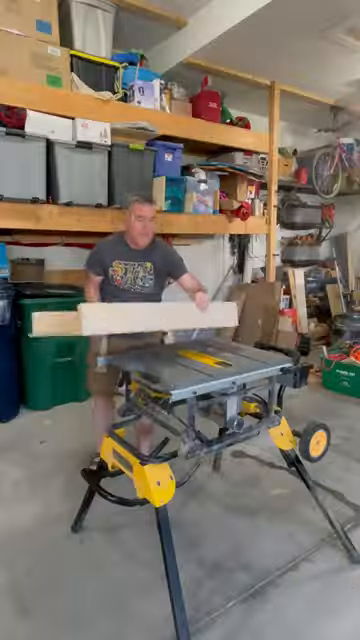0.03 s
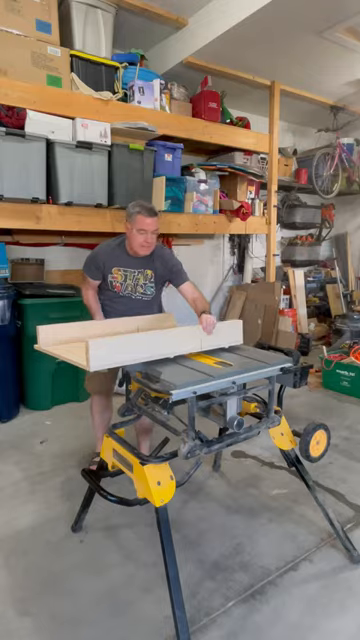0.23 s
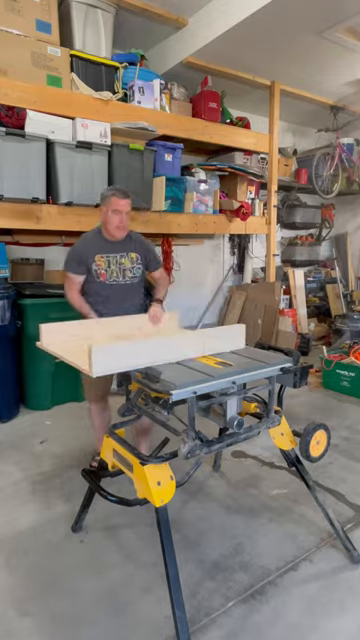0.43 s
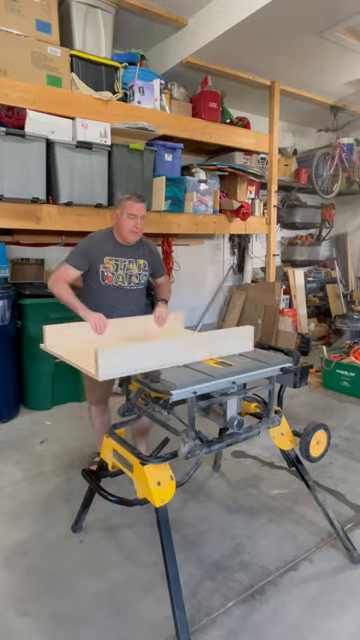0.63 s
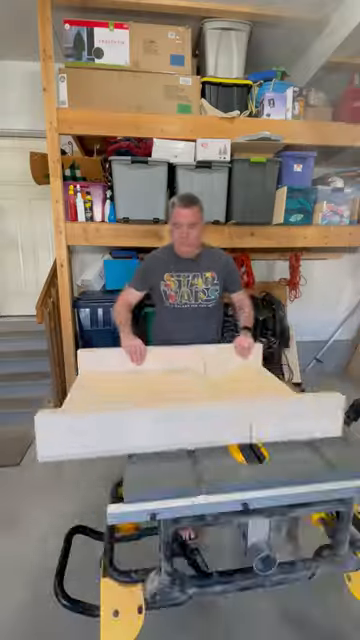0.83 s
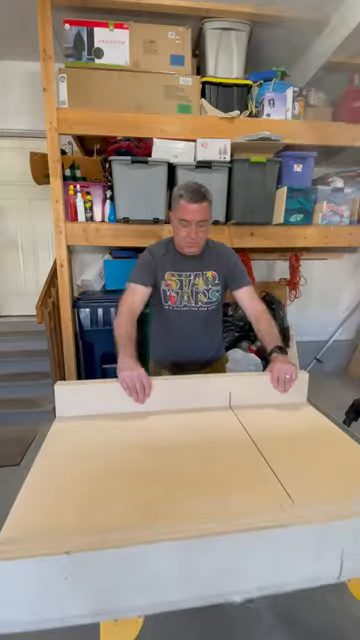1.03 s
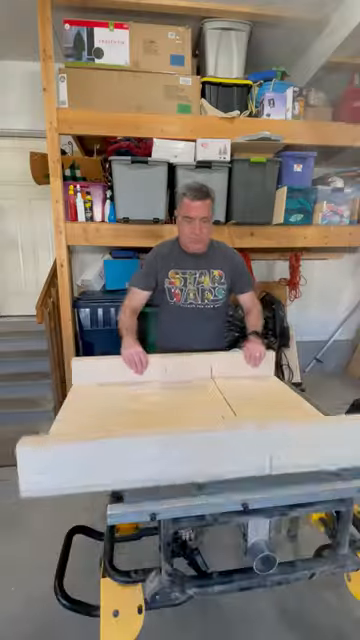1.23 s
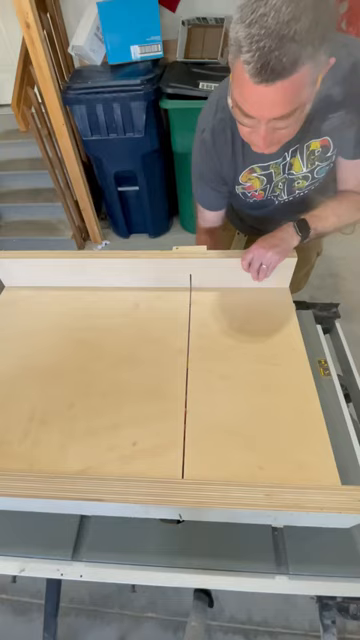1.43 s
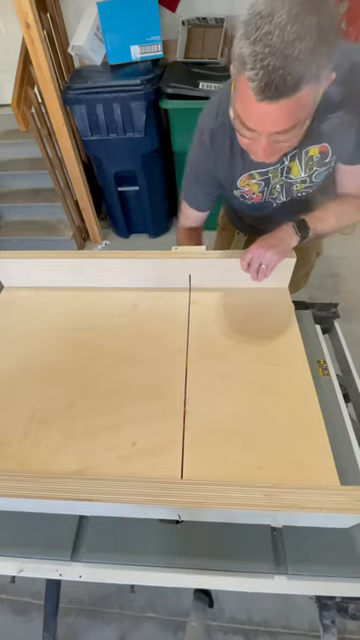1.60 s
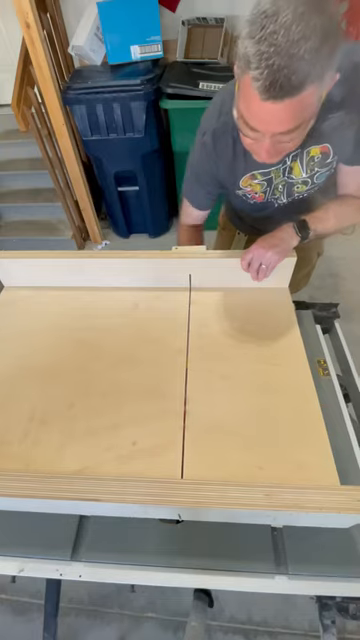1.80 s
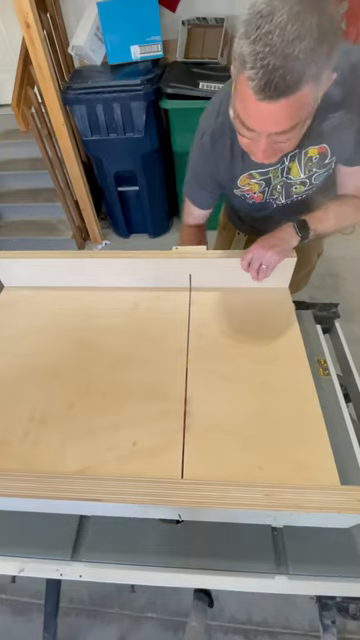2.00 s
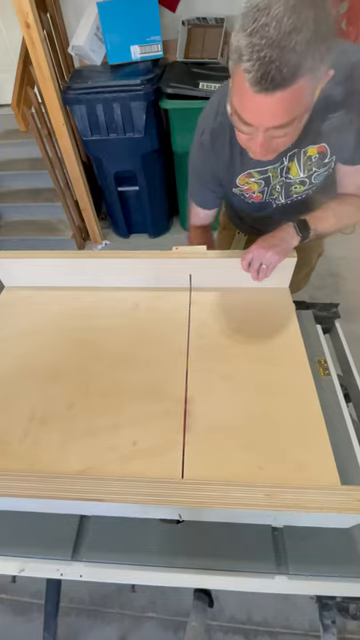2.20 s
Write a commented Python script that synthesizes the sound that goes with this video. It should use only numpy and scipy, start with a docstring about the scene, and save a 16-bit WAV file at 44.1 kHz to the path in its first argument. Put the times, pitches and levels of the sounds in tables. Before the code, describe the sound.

A plywood sled knocks onto a table saw at about 0.2 seconds and claps flat with a loud, short rattle around 0.3. From 0.6 to 1.4 seconds it slides in a few quieter, rasping pushes with faint hollow bumps. From 1.5 to about 2.4 seconds a crank is wound fast, roughly nine turns, its gears clicking, knocking and grinding in rhythm. The garage adds a short reverberation.

```python
"""Plywood sled on a table saw

In a garage, a sled lands on one edge, then claps flat and rattles: impacts excite the board's modes.
It is pushed over the table a few times, and sliding friction makes it hiss, rasp and ring.
Then a crank on the saw is wound fast: a train of gear-tooth impacts drives the housing into
resonance, and the gears knock, bind and grind once every turn."""
import sys
import numpy as np
from scipy import signal
from scipy.fft import rfft, irfft, next_fast_len
from scipy.io import wavfile
from scipy.ndimage import uniform_filter1d

SR = 44100
rng = np.random.default_rng(int(sys.argv[2]) if len(sys.argv) > 2 else 0)


def pcm_store(signal):
    """Save signal as 16-bit PCM."""
    levels = np.round(np.clip(np.atleast_2d(signal), -1, 1) * 32767)
    wavfile.write(sys.argv[1], SR, levels.astype(np.int16).T)


N = 103635
T = np.arange(N) / SR

# Levels in the tables are relative.
# skids of the sled's edge (start [s], length [s], hiss [dB], rasp [dB], fall [dB/s])
SKIDS = [(0, 0.092, -59.5, -84, 197), (0.179, 0.33, -39.5, -40, 69.5), (0.786, 0.028, -56, -46.5, 202),
         (0.983, 0.063, -59, -48.5, 206), (1.314, .015, -79, -64, 300)]
# impacts on the table (time [s], thud [dB], crack [dB], contact cut-off [Hz], flatness [0-1])
BLOWS = [(0.1818, -21, -52, 760, 0.18), (.192, -26, -46, 800, 0.7), (.2200, -19, -33.5, 3740, 0),
         (0.2324, -24, -47, 1170, 0), (.249, -27, -51.5, 1000, .1), (0.2839, -9.5, -36, 695, .2),
         (0.2908, -14, -18.5, 2860, 0.98), (.3190, -18.5, -31.5, 2520, 0.98),
         (.3270, -13, -27.5, 4620, 0.94), (0.3393, -24, -27, 2970, 0.86), (.477, -40.5, -70, 1200, 0.5),
         (.813, -29.5, -51, 1300, 0.06)]
# modes of the sled (frequency [Hz]) and, row for row, (level on edge [dB], level flat [dB], t60 [s])
SLED_HZ = [165, 328, 440, 531, 615, 660, 733, 845, 1056, 1158, 1324, 1940, 2522, 3081]
SLED_MODES = [(-34, -21.5, 0.19), (-2, -8, 0.15), (-5.5, -7.5, .16), (-4, -7, 0.16), (1, -6, 0.12),
              (-3.5, 1.5, .13), (5, -3, 0.17), (2, -9, 0.15), (-26, 6.5, 0.09), (-9, -1.5, 0.17),
              (-22, 7.5, 0.13), (-1.5, -9.5, 0.092), (-20, -16.5, .15), (-13.5, -22, 0.06)]
# spectra of the board's dense resonances and of the faces meeting (frequency [Hz], level [dB])
BOARD = [(30, -25), (100, -24), (170, -16.5), (320, -7.5), (700, 0.5), (1000, -1.5), (1350, 0), (1800, -3),
         (3200, -4.5), (6000, -16.5), (16000, -6)]
CRACK = [(100, -30.5), (600, -2), (1300, 0.5), (2500, 0), (5000, 2.5), (9000, -2), (13000, -6), (16000, -4)]
# friction during the pushes (time [s], hiss [dB], rasp [dB])
PUSHES = [(0.585, -100, -87), (0.599, -79, -66.5), (0.631, -60, -47.5), (0.671, -46.5, -43),
          (0.715, -45, -49), (0.721, -60, -55), (0.731, -68, -51), (0.773, -47, -40.5),
          (0.815, -48.5, -41.5), (0.857, -43.5, -39), (0.925, -47, -49), (0.999, -45, -44),
          (1.057, -55, -43.5), (1.117, -65.5, -54.5), (1.157, -55.5, -43), (1.199, -47, -39.5),
          (1.269, -51, -49.5), (1.325, -66, -54.5), (1.367, -71.5, -64), (1.383, -83.5, -81.5),
          (1.4, -77, -93.5)]
# friction spectra (frequency [Hz], level [dB])
HISS = [(300, -26.5), (1500, -6.5), (3000, -4), (4500, -1.5), (7000, -3), (10000, -6.5), (13000, -13),
        (16000, -16.5)]
RASP = [(60, -45), (150, -6), (320, 0), (560, -8), (760, 0), (1000, 0.5), (1450, 1.5), (2000, -1),
        (2600, -0.5), (4500, -5.5), (9000, -21.5)]
# modes driven by sliding (frequency [Hz], level [dB], t60 [s])
SLIDE_MODES = [(736.3, 1, 0.17), (1283, -4.5, .16), (1510, -2.5, 0.1), (1557, 0, .15), (2050, -4.5, 0.11),
               (2532, 0, .12), (4246, 0.5, 0.056)]
# hollow bumps of the rocking sled (time [s], level [dB])
BUMPS = [(0.734, -43), (.908, -46), (1.252, -44.5)]
# turns of the crank (time of peak load [s], load [dB], time slack is taken up [s], knock [dB])
TURNS = [(1.471, -2, 1.4505, -33), (1.581, -1.5, 1.561, -46), (1.688, -2.5, 1.669, -42),
         (1.796, -0.9, 1.774, -41), (1.907, -1.3, 1.876, -37), (2.01, -0.7, 1.983, -39),
         (2.112, 0, 2.098, -34.5), (2.217, -2.5, 2.195, -34.5), (2.325, -1, 2.3, -38)]
# meshing rate of the gear teeth (time [s], rate [Hz])
TOOTH_RATE = [(1.45, 157.8), (1.57, 170.6), (1.78, 159.6), (1.90, 162.9), (2.03, 146.4), (2.11, 151.2),
              (2.21, 143.5), (2.33, 168.7)]
# spectra of tooth click, grinding, housing rumble and shaft hiss (frequency [Hz], level [dB])
TOOTH = [(100, -51.5), (300, -6.5), (600, -16), (850, -2), (1050, -5.5), (1450, 0.5), (1800, -1.5),
         (2500, -9), (3400, -21.5), (4200, -17), (5200, -34), (15000, -41)]
GRIND = [(500, -27), (1500, 3), (2600, -1.5), (3600, -1.5), (4300, -6.5), (5000, -4), (5800, -5.5),
         (7500, -14.5), (10000, -22.5), (15000, -23)]
RUMBLE = [(30, -24), (70, -26), (110, -10), (150, 3), (220, -8.5), (300, 6.5), (380, -7), (600, -17),
          (1500, -66)]
SHAFT = [(500, -25), (2500, 3), (4000, 1.5), (5000, -23), (8000, 0), (10000, -7.5), (15000, -10)]
# modes of the gears, the knock and the saw's housing (frequency [Hz], level [dB], t60 [s])
GEAR_MODES = [(1428, 4.5, 0.02), (1870, 3, 0.017), (3475, -2, 0.014), (3810, 0.5, .015),
              (4260, -2.5, 0.022)]
KNOCK_MODES = [(754, 0, 0.087), (853, -7.5, 0.15), (1168, -7, 0.2)]
HOUSING_MODES = [(301, -3.5, .12), (460.3, -11.5, .25), (759.6, 5.5, 0.13), (858, -2.5, 0.17),
                 (1142, 0, 0.39), (1200, 4.5, 0.073), (1314, -3, 0.099), (1448, -0.5, 0.15),
                 (1558, 1.5, 0.15), (1730, 2.5, 0.15), (1895, 1.5, 0.088)]
# reverberation time of the garage (frequency [Hz], t60 [s])
ROOM_T60 = [(200, 0.55), (600, 0.3348), (1500, 0.31), (4000, 0.2845), (10000, 0.3955), (16000, 0.17)]
# background noise of the garage (frequency [Hz], level [dB])
AIR = [(25, -12.5), (60, -3), (110, -6.5), (170, 6.5), (260, -8), (350, -3.5), (550, -17), (1500, -22),
       (5000, -22), (16000, -22.5)]
# microphone pair: side against mid, and left against right (frequency [Hz], gain [dB])
WIDTH = [(100, -20), (350, -37), (700, -33), (1400, -7), (2500, 0), (6000, -3), (14000, 1)]
BALANCE = [(300, .1), (700, .5), (1400, 4), (2500, 5), (4500, 1.4), (12000, .6)]

CRANK_START_S = 1.4505


def amp(db):
    """Amplitude ratio of a level in decibels."""
    return 10 ** (np.asarray(db) / 20)


def unit(x):
    """Normalisation to rms 1."""
    return x / np.sqrt(np.mean(x ** 2))


def curve(rows, column=1):
    """Linear interpolation in time."""
    rows = np.array(rows)
    return np.interp(T, rows[:, 0], rows[:, column])


def at_hz(points, hz):
    """Interpolation on a log-frequency axis."""
    points = np.array(points)
    return np.interp(np.log(np.maximum(hz, 1)), np.log(points[:, 0]), points[:, 1])


def colour(x, points):
    """Minimum-phase filtering: folding the cepstrum makes the given response causal."""
    size = 2 * next_fast_len(N)
    cepstrum = irfft(np.log(amp(at_hz(points, np.fft.rfftfreq(size, 1 / SR)))))
    cepstrum[1:size // 2] *= 2
    cepstrum[size // 2 + 1:] = 0
    return irfft(rfft(x, size) * np.exp(rfft(cepstrum)))[..., :N]


def convolve(x, response):
    """Output of a linear system with the given impulse response."""
    return signal.fftconvolve(x, response)[:N]


def noise(points):
    """Spectrally shaped Gaussian noise of rms 1."""
    return unit(colour(rng.standard_normal(N), points))


def flutter(rate_hz):
    """Continuous random modulation of rms 1."""
    return unit(np.interp(T * rate_hz, np.arange(N), rng.standard_normal(N)))


def tap(start):
    """Unit impulse at the given time."""
    return np.interp(np.arange(N) - start * SR, [-1, 0, 1], [0, 1, 0])


def rise(start, length_s):
    """Linear onset from 0 to 1."""
    return np.clip((T - start) / length_s, 0, 1)


def decay(start, t60):
    """Exponential damping: a sudden start, then 60 dB down in t60 seconds."""
    return (T >= start) * np.exp(-np.log(1000) * np.maximum(T - start, 0) / t60)


def ringing(modes):
    """Modal superposition: an impulse response of damped sinusoids, alternating in sign."""
    t = T[:SR // 2]
    return sum((-1) ** k * amp(db) * np.sin(2 * np.pi * hz * t) * np.exp(-np.log(1000) * t / t60)
               for k, (hz, db, t60) in enumerate(modes))


def stereo(mid, side):
    """Spatial coherence: two close microphones are alike in the bass, unrelated in the treble."""
    side = colour(side, WIDTH)
    return np.array([mid + side, mid - side])


def garage(x, room_db):
    """Reflection adds scatter from the table top and a diffuse tail to the direct sound."""
    centres = np.array(ROOM_T60)[:, 0]
    hz = np.fft.rfftfreq(2 * N, 1 / SR)
    white, tail = rfft(rng.standard_normal((2, 2 * N))), 0
    for share, (_, t60) in zip(np.eye(len(centres)), ROOM_T60):
        band = irfft(white * at_hz(np.c_[centres, share], hz))[:, :N]
        tail = tail + band * decay(0, t60)
    build_up = 1 - np.exp(-T / 0.0015)
    tail = unit(tail * build_up) * amp(room_db) / np.sqrt(N)
    scatter = unit(rng.standard_normal(N) * decay(0, t60=0.014)) * amp(-1) / np.sqrt(N)
    return stereo(x + convolve(x, tail[0]), convolve(x, tail[1] + scatter))


def background():
    """Stationary noise, strongest in the bass, fills the garage."""
    return amp(-63.5) * stereo(noise(AIR), noise(AIR))


def sled_skids():
    """Transient friction: hiss and rasp envelopes that jump and die away as the edge catches."""
    hiss, rasp = 0, 0
    for start, length, hiss_db, rasp_db, fall in SKIDS:
        fade = amp(-fall * np.maximum(T - start, 0))
        skid = rise(start, 0.0045) * (T < start + length) * fade
        hiss = hiss + amp(hiss_db) * skid
        rasp = rasp + amp(rasp_db) * skid
    return hiss, rasp


def sled_blows():
    """Impact excitation: softer contact gives a duller ring; lying flat, the board rings higher."""
    board, crack, modes = 0, 0, 0
    for start, thud_db, crack_db, contact_hz, flat in BLOWS:
        contact = signal.butter(2, contact_hz, fs=SR)
        ring = ringing([(hz, edge_db + flat * (flat_db - edge_db), t60)
                        for hz, (edge_db, flat_db, t60) in zip(SLED_HZ, SLED_MODES)])
        struck = convolve(tap(start), ring) + 1e-18
        modes = modes + amp(thud_db - 9.5) * signal.lfilter(*contact, struck)
        rattle = rng.standard_normal(N) * decay(start, t60=0.12) + 1e-18
        rattle_db = thud_db - 1.5 * (1 - flat)  # on its edge the board rattles less
        board = board + amp(rattle_db) * signal.lfilter(*contact, rattle)
        clap = rng.standard_normal(N) * rise(start, 0.0036) * decay(start, t60=0.1)
        crack = crack + amp(crack_db) * clap
    burst = sum(colour(x, spectrum) / np.linalg.norm(colour(tap(0), spectrum))  # unit-energy filters
                for x, spectrum in ((board, BOARD), (crack, CRACK)))
    return garage(burst, room_db=-6) + garage(modes, room_db=-27)


def sled_slide():
    """Stick-slip friction: countless tiny catches hiss, rasp and drive modes that come and go."""
    grain_db, wander_db = 3, 3.5
    skid_hiss, skid_rasp = sled_skids()
    hiss_level = amp(curve(PUSHES, 1) + 2.5) + skid_hiss
    rasp_level = amp(curve(PUSHES, 2) - 2.5 + 1.2 * flutter(rate_hz=45)) + skid_rasp
    mid_side = []
    for _ in range(2):
        catches = rng.standard_normal((2, N)) * amp(grain_db * rng.standard_normal((2, N)))
        ring = sum(amp(wander_db * flutter(rate_hz=16)) * convolve(catches[1], ringing([mode]))
                   for mode in SLIDE_MODES)
        rasp = unit(colour(catches[0], RASP)) + amp(-4) * unit(ring)
        hiss = unit(colour(catches[1], HISS))
        mid_side.append(rasp_level * rasp + hiss_level * hiss)
    return stereo(*mid_side)


def sled_bumps():
    """Damped resonance: gentle rocking sounds one hollow, wavering note of the board."""
    swell = sum(amp(db) * rise(start, 0.0071) * decay(start, t60=0.19) for start, db in BUMPS)
    pitch_hz = 492 * (1 + 0.037 * flutter(rate_hz=55))
    return swell * np.sin(2 * np.pi * np.cumsum(pitch_hz) / SR)


def tooth_impacts():
    """Gear meshing: a quasi-periodic impulse train, uneven in timing and strength."""
    jitter, scatter_db = 0.08, 1.4
    rate_hz, teeth, i = curve(TOOTH_RATE), np.zeros(N), int(CRANK_START_S * SR)
    for late, strength in rng.standard_normal((N // 100, 2)):
        if i < N:
            teeth[i] = amp(scatter_db * strength)
            i += int(SR / rate_hz[i] * np.exp(jitter * late))
    return teeth


def binding(rise_s, fall_s):
    """Cyclic loading: one bell-shaped pulse each turn as the gears bind."""
    return sum(amp(db) * np.exp(-0.5 * ((T - peak) / np.where(T < peak, rise_s, fall_s)) ** 2)
               for peak, db, _, _ in TURNS)


def slack_knocks():
    """Backlash: taking up the slack strikes a hollow note once a turn."""
    strikes = sum(amp(db) * tap(start) for _, _, start, db in TURNS)
    return convolve(strikes, ringing(KNOCK_MODES) * rise(0, 0.002)[:SR // 2])


def crank():
    """Forced vibration: teeth ring the gears and housing, clicking and grinding harder under load."""
    def level(x, db):
        """Normalisation to an rms level over the time the crank turns."""
        return x * amp(db) / np.std(x[T >= CRANK_START_S])

    teeth = tooth_impacts()
    load = binding(rise_s=0.024, fall_s=0.013)
    pressure = binding(rise_s=0.015, fall_s=0.015)
    rub = convolve(teeth, np.exp(-T / 0.006)) * rng.standard_normal(N)  # a noise burst per tooth
    clicks = level(colour(teeth * amp(11 * load), TOOTH), db=-43)
    gears = level(convolve(teeth * amp(15 * load), ringing(GEAR_MODES)), db=-46)
    grind = level(colour(rub * amp(11 * pressure), GRIND), db=-46.5)
    housing = level(convolve(teeth * amp(7 * load), ringing(HOUSING_MODES)), db=-42.5)
    rumble = level(colour(rub * amp(load), RUMBLE), db=-46.5)
    shaft_hiss = amp(-55) * (T >= CRANK_START_S) * stereo(noise(SHAFT), noise(SHAFT))
    chatter = garage(clicks + gears + grind, room_db=-4)
    body = garage(housing + slack_knocks(), room_db=-14)
    return chatter + body + rumble + shaft_hiss


def suppress(x):
    """Downward expansion: the band above the split is turned down when it gets quiet."""
    split_hz, threshold_db, slope = 560, -54.5, 0.66
    low = signal.sosfiltfilt(signal.butter(3, split_hz, fs=SR, output="sos"), x)
    high = x - low
    power = uniform_filter1d(np.mean(high ** 2, axis=0), size=900)
    rms = np.sqrt(np.abs(power) + 1e-18)
    return low + high * np.minimum(rms / amp(threshold_db), 1) ** slope


def scene():
    """Superposition of the sled, the crank and the background."""
    return sled_blows() + sled_slide() + sled_bumps() + crank() + background()


def record(dry):
    """Expansion, then band-limiting; the left microphone favours the upper mids."""
    low_cut_hz, top_hz = 186, 15700
    pair = [colour(x, [(hz, sign * db / 2) for hz, db in BALANCE])
            for x, sign in zip(suppress(dry), (1, -1))]
    pair = signal.sosfilt(signal.butter(2, low_cut_hz, "high", fs=SR, output="sos"), pair)
    return signal.sosfilt(signal.ellip(10, 0.1, 80, top_hz, fs=SR, output="sos"), pair)


dry = scene()
out = record(dry)
pcm_store(out)
```